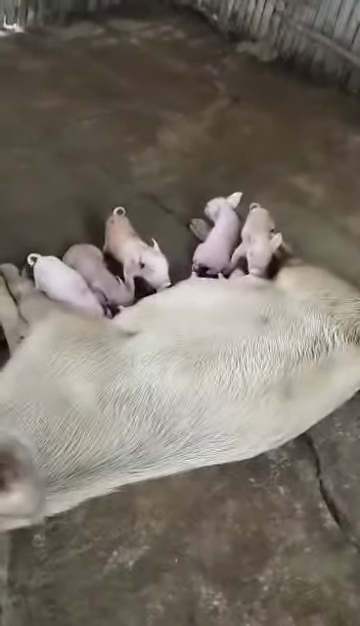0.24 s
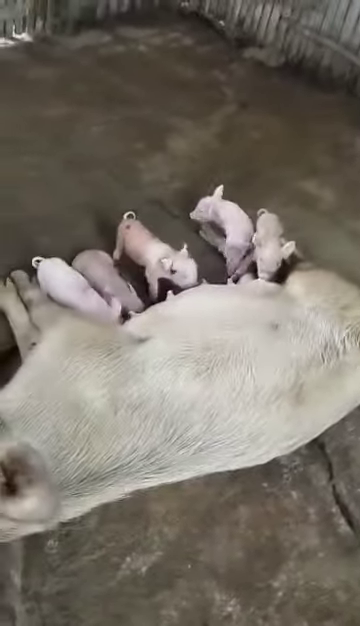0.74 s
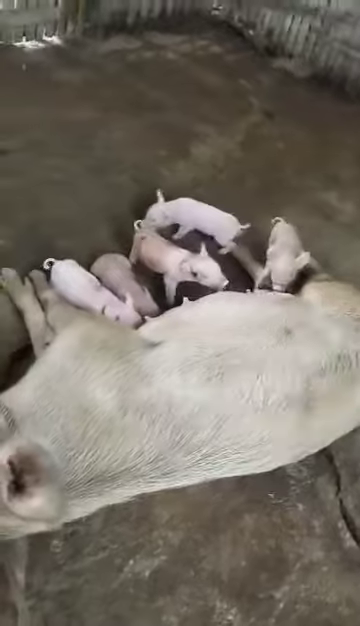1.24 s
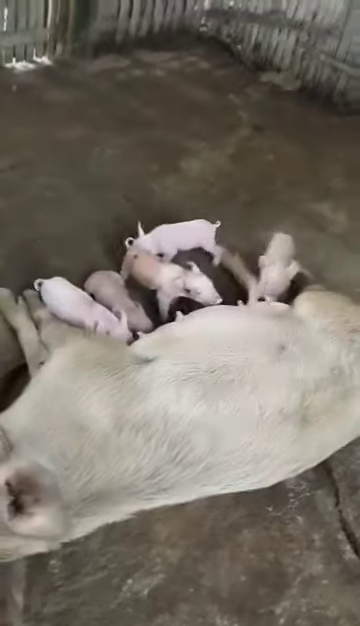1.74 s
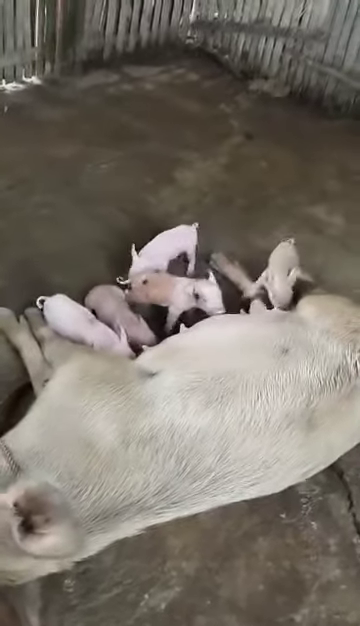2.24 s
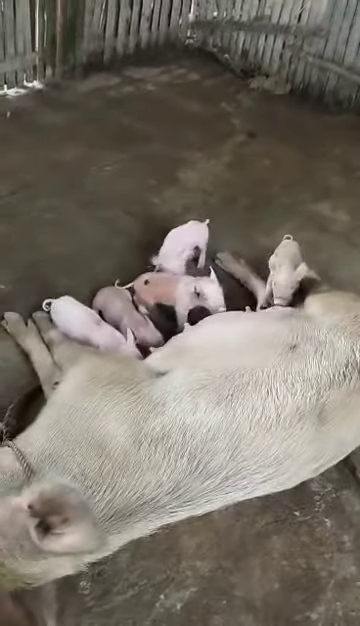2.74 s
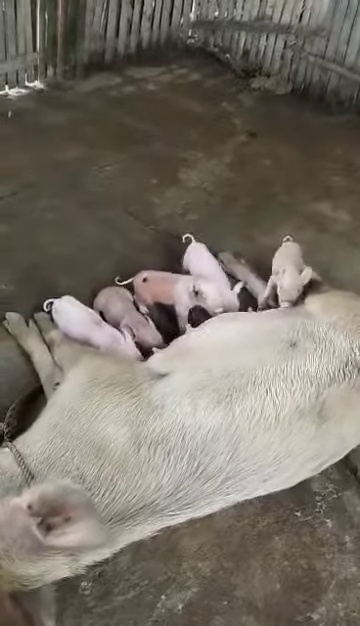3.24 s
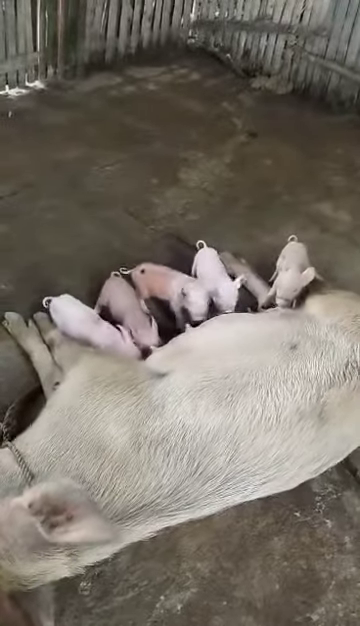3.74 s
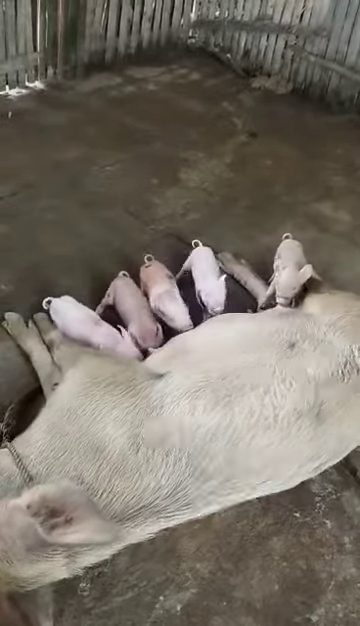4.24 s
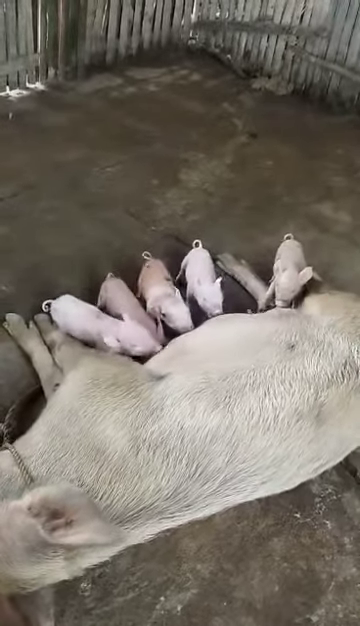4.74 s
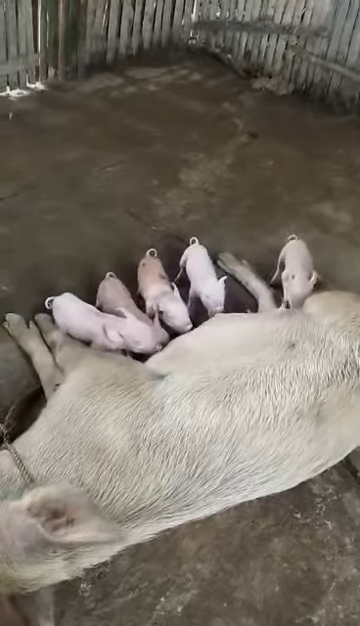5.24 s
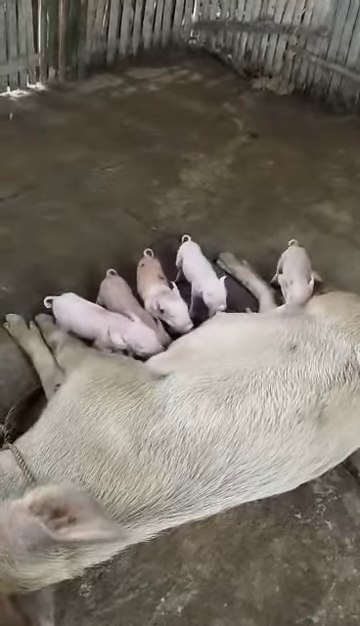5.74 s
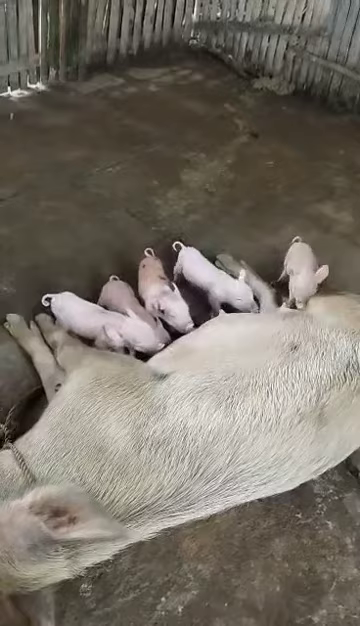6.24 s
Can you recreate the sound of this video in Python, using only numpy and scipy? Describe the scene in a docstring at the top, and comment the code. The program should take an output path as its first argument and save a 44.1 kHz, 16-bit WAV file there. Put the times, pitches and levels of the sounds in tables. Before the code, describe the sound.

A few small hoof ticks and a brief rustle on concrete give way to the low, rattling grunts of a nursing sow, heard from nearby in a pen. After a pause the grunts become a regular rhythm, strongest around the middle, and she sometimes snores as she breathes in. Her piglets snuffle very quietly. Underneath lie a faint, steady, high insect hiss and a slight wind rumble on the microphone.

```python
"""A nursing sow in a concrete pen

Each grunt is a short hum of the vocal folds that breaks into slow flaps of the soft palate, which echo
along her windpipe; between grunts she snores in. Piglets snuffle, tick their hooves and rustle on the
floor. Light wind rumbles on both microphones, the yard drones and far insects hiss near 4 kHz."""
import sys
import numpy as np
from scipy import signal
from scipy.fft import rfft, irfft, next_fast_len
from scipy.io import wavfile
from scipy.ndimage import uniform_filter1d, map_coordinates

SR = 44100
rng = np.random.default_rng(int(sys.argv[2]) if len(sys.argv) > 2 else 0)


def digitize_waveform(pressure):
    """Quantize a signal to 16-bit integers and store it at the path in sys.argv[1].

    Rows of a 2-D input are taken as channels; values are limited to [-1, 1].
    """
    field = np.atleast_2d(pressure).T
    bounded = np.clip(field, -1, 1)
    quanta = np.round(bounded * 32767).astype(np.int16)
    wavfile.write(sys.argv[1], SR, quanta)


N = 285327
TIME = np.arange(N) / SR
EVENT_TIME = np.arange(SR // 10) / SR


def amp(db):
    """Amplitude ratio of a level in decibels."""
    return 10 ** (np.asarray(db) / 20)


def unit(x):
    """Normalisation to rms 1."""
    return x / np.sqrt(np.mean(x ** 2) + 1e-20)


def along(points, hz):
    """Interpolation of (frequency_hz, value) points on a logarithmic frequency axis."""
    f, values = np.transpose(points)
    return np.interp(np.log(hz + 1), np.log(f + 1), values)


def curves(tables, edge_s=.006):
    """Linear envelopes: a gate open during each table, then a curve for each column after time."""
    gate = sum(np.interp(TIME, [t[0][0] - edge_s, t[0][0], t[-1][0], t[-1][0] + edge_s], [0, 1, 1, 0])
               for t in tables)
    times, *columns = np.concatenate(tables).T
    return [gate] + [np.interp(TIME, times, column) for column in columns]


def wobble(rate_hz):
    """Smooth random modulation: a spline through Gaussian knots."""
    return map_coordinates(rng.standard_normal(int(N * rate_hz / SR) + 4), [TIME * rate_hz])


def filtered(x, response):
    """Linear filtering: the spectrum of x times a frequency response."""
    size = next_fast_len(N + SR // 8, real=True)
    return irfft(rfft(x, size) * response(np.fft.rfftfreq(size, 1 / SR)), size)[..., :N]


def modes(table, f):
    """Superposition of damped resonances, each (centre_hz, width_hz, gain_db)."""
    return sum(amp(db) * 1j * f * width / (hz * hz - f * f + 1j * f * width) for hz, width, db in table)


def band(x, hz):
    """Band-pass filtering, a fifth either side of hz."""
    return signal.lfilter(*signal.butter(2, [hz / 1.5, hz * 1.5], "band", fs=SR), x)


def noise(spectrum, correlation):
    """Partly coherent stereo noise of rms 1, from the sum and difference of two independent noises."""
    angle = np.arccos(correlation) / 2
    mid, side = filtered(rng.standard_normal((2, N)), lambda f: amp(along(spectrum, f)))
    mid, side = np.cos(angle) * mid, np.sin(angle) * side
    return unit(np.array([mid + side, mid - side]))


# Spectrum of the wind: frequency_hz, density_db
WIND_SPECTRUM = [(8.8, -50.5), (15, 4.5), (78, -3.5), (92, -18), (110, -4.5), (140, -57.5), (240, -120)]
# Gusts: peak_s, above_lull_db
WIND_GUSTS = [(.36, 10), (1.49, 10), (2.379, 11.5), (3.301, 12.5), (4.2, 15), (5.4, 13), (6.3, 12)]


def wind(lull_db=-57, gust_s=.41):
    """Turbulence: pressure fluctuates unevenly on each microphone, more strongly on the left."""
    lumps = amp(2.5 * np.array([wobble(6), wobble(9)]))
    gust_db = sum(db * np.exp(-((TIME - peak_s) / gust_s) ** 2) for peak_s, db in WIND_GUSTS)
    rumble = unit(lumps * noise(WIND_SPECTRUM, correlation=.46))
    return amp(lull_db + gust_db) * rumble * amp([[2.2], [-2.2]])


# Spectrum of the yard's drone: frequency_hz, density_db
YARD_SPECTRUM = [(53, -30.5), (90, -27.5), (123, 5), (178, -7), (244, -5), (452, -11.5), (795, -18.5),
                 (1200, -51), (1560, -62), (2640, -120)]
# Its envelope: time_s, level_db
YARD_LEVELS = [(0, -58), (.8, -57.5), (1.3, -61.5), (2.7, -58), (4.55, -58), (6.47, -61)]


def yard():
    """Amplitude-modulated low noise: the dull drone of the yard."""
    _, level_db = curves([YARD_LEVELS])
    return amp(level_db + 1.4 * wobble(12)) * noise(YARD_SPECTRUM, correlation=.66)


# Spectrum of far insects: frequency_hz, density_db
INSECT_SPECTRUM = [(590, -36.5), (1000, -1), (1100, -5.5), (1420, -6), (1880, -8), (2340, -7),
                   (2520, -14.5), (2720, -6.5), (3150, -9.5), (3400, -0.5), (3900, 1), (4450, -1),
                   (4800, -11), (6950, -14.5), (7920, -20.5), (12500, -29.5), (13500, -18.5)]


def insects(level_db=-64):
    """Incoherent summation: far insects merge into a nearly steady, diffuse hiss."""
    return amp(level_db + .36 * wobble(1.7)) * noise(INSECT_SPECTRUM, correlation=0)


# Piglet sniffs: start_s, level_db, centre_hz, length_s
SNIFFS = [(0.02, -59, 405, 0.12), (0.261, -66.5, 1050, 0.06), (0.65, -59, 850, 0.061),
          (2.755, -50.5, 392, 0.075), (3.983, -61, 750, 0.071), (5.241, -63, 632, 0.039),
          (5.554, -58, 413, 0.11)]


def snuffles():
    """Turbulent flow in piglet snouts: band noise under a sine arch, cut off at 0.1 s."""
    out, t = np.zeros(N), EVENT_TIME
    for start_s, db, hz, length_s in SNIFFS:
        swell = np.sin(np.pi * np.clip(t / length_s, 0, 1))
        out[round(start_s * SR):][:len(t)] += amp(db) * swell * unit(band(rng.standard_normal(len(t)), hz))
    return out


# Hooves on concrete: start_s, level_db, pitch_hz, t60_s
HOOF_TICKS = [(0.1327, -28.5, 3080, 0.0053), (0.1332, -35, 4280, 0.016), (0.1422, -30, 3400, 0.0095),
              (0.396, -53, 4400, 0.07), (1.322, -47, 4700, 0.024), (1.917, -49, 4230, 0.019),
              (4.597, -51, 3920, 0.17), (5.2627, -46.5, 4150, 0.042)]


def hooves():
    """Impact excitation: each small hoof gives a tone and gritty noise that decay exponentially."""
    out, t = np.zeros((2, N)), EVENT_TIME
    for start_s, db, hz, t60_s in HOOF_TICKS:
        tick = .37 * np.sin(2 * np.pi * hz * t) + .81 * rng.standard_normal((2, len(t)))
        out[:, round(start_s * SR):][:, :len(t)] += band(amp(db - 60 * t / t60_s) * tick, hz)
    return out


# Envelope of the rustle: time_s, level_db
RUSTLE_LEVELS = [(0.145, -75.5), (0.153, -62.5), (0.205, -50), (0.215, -63)]
# Spectrum of the litter: frequency_hz, density_db
LITTER_SPECTRUM = [(710, -6), (1200, -9.5), (3350, -3.5), (9830, -10), (11100, -26), (12500, -1),
                   (13600, -13)]


def rustle():
    """Friction noise: a piglet drags over the litter and stops short."""
    gate, level_db = curves([RUSTLE_LEVELS], edge_s=.003)
    return gate * amp(level_db + .85 * wobble(200)) * noise(LITTER_SPECTRUM, correlation=.33)


def windpipe(x, echo, round_trip_s=.0088):
    """Comb filtering: sound returns from the windpipe's far end again and again, duller each time."""
    def response(f):
        round_trip = echo * np.exp(-2j * np.pi * f * round_trip_s) / (1 + 1j * f / 2500)
        return 1j * f / (70 + 1j * f) / (1 - round_trip)
    return filtered(x, response)


def hum_shape(start_s, length_s, swell_s, db, first_hz, held_hz, last_hz,
              throat_hz, mouth, rough, snout_hz, snout_db):
    """Tension sets pitch: one hum's envelopes, as the folds settle, glide and roughen."""
    swell_db_per_s, fade_db_per_s, settle_s = 133.5, 150.5, .01193
    progress = np.linspace(0, 1, 24)
    t = progress * length_s
    level_db = db - swell_db_per_s * np.maximum(swell_s - t, 0) - fade_db_per_s * np.maximum(t - swell_s, 0)
    level_db -= 11 * progress ** 6  # dies away just before the palate lets go
    onset = np.exp(-(t / settle_s) ** 3)
    hz = held_hz + (last_hz - held_hz) * progress + (first_hz - held_hz) * onset
    hiss_db = db - 19.5 - 23.5 * np.exp(-t / .022)  # the breath arrives late
    # The mouth is wider at a tight onset, and again towards the first flap.
    opening = mouth + .013 * max(first_hz - held_hz, 0) * onset + .1 * progress ** 2
    roughness = rough * (1 + .7 * progress)
    columns = start_s + t, level_db, hz, throat_hz, hiss_db, opening, roughness, snout_hz, snout_db
    return np.transpose(np.broadcast_arrays(*columns))


# Hums of the vocal folds: start_s, length_s, swell_s, level_db, first_pitch_hz, held_pitch_hz,
# last_pitch_hz, throat_hz, mouth_opening, roughness, snout_hz, snout_db
FOLD_HUMS = [(0.4405, 0.061, 0.01, -34.5, 190, 199, 224.4, 212, 0.33, 0.31, 1140, -12),
             (1.363, 0.046, 0.034, -31.5, 190, 208, 213, 222, 0.56, 0.31, 1000, -41),
             (2.106, 0.069, 0.062, -26, 213, 224.5, 198.5, 232, 0.25, 0.42, 720, -28),
             (2.936, 0.088, 0.062, -22, 217.2, 143, 155.3, 233, 0.4, 0.16, 1500, -32.5),
             (3.323, 0.063, 0.076, -17, 196, 145.5, 136.8, 233, 0.28, 0.15, 1040, -27),
             (3.86, 0.056, 0.014, -29, 190.2, 140.6, 133.4, 204, 0.5, 0.3, 1120, -24.5),
             (4.3196, 0.049, 0.045, -26.5, 198.3, 145.7, 134.8, 241, 1, 0.3, 1132, -18),
             (4.7937, 0.048, 0.02, -26.5, 198, 147.3, 138, 236, 0.6, 0.32, 1180, -20.5),
             (5.349, 0.037, 0.03, -30, 191.7, 182, 174, 207, 0.7, 0.25, 1130, -25),
             (5.891, 0.054, 0.021, -30, 192, 146.6, 114, 202, 0.4, 0.23, 1200, -21),
             (6.4083, 0.058, 0.019, -28, 204.8, 138.6, 138.3, 217, 0.52, 0.27, 1210, -24)]
# Upper formants that open with the mouth: centre_hz, width_hz, gain_db
UPPER_FORMANTS = [(567, 38, -1), (1000, 8.1, -23), (1370, 110, -49.5), (1650, 130, -42)]


def hum():
    """Source and filter: formants weight the folds' harmonics. Gives voice and two breath envelopes."""
    shapes = [hum_shape(*row) for row in FOLD_HUMS]
    gate, db, hz, throat_hz, hiss_db, mouth, rough, snout_hz, snout_db = curves(shapes, edge_s=.003076)
    mouth, on = np.clip(mouth, 0, 1), gate > 0
    turns = np.cumsum(hz * (1 + .232 * rough * wobble(120))) / SR  # pitch jitter
    phase = (turns - np.maximum.accumulate(turns * ~on)) % 1  # restarts with each hum
    harmonic = np.arange(1, 17)[:, None]
    f = harmonic * hz[on]
    throat = abs(modes([(throat_hz[on], 90, 0)], f)) ** 2.2
    upper = amp(-10) * mouth[on] * abs(modes(UPPER_FORMANTS, f))
    closure = amp(-28.5) / harmonic  # sharp closing of the folds feeds every overtone
    snout = abs(modes([(snout_hz[on], 280, snout_db[on])], f)) ** 1.4
    knots = rng.standard_normal((len(harmonic), round(70 * N / SR) + 4))
    shimmer = map_coordinates(knots, np.broadcast_arrays(harmonic - 1, 70 * TIME[on]), order=1)
    weights = (throat + upper + closure + snout) * amp(14 * rough[on] * shimmer)
    weights *= amp(6 * rough[on] * shimmer[-1]) / np.sqrt(np.sum(weights ** 2, 0) / 2)
    voice = np.zeros(N)
    # Harmonics in step make one suction a cycle.
    voice[on] = -np.sum(weights * np.cos(harmonic * (2 * np.pi * phase[on] - .41)), 0)
    hiss = amp(hiss_db) * gate * (.9 + np.exp(-3 * phase))
    return windpipe(amp(db) * gate * voice, echo=.15), (1 - mouth) * hiss, mouth * hiss


def wet_air(patchy_db):
    """Turbulence in a wet airway: half-coherent stereo noise, patchy in frequency and time."""
    shared = rng.standard_normal(N)
    air = np.array([np.roll(shared, 16), shared]) + rng.standard_normal((2, N))
    spectra = signal.stft(air, nperseg=256)[2]
    patches = uniform_filter1d(rng.standard_normal(spectra.shape[1:]), size=3, axis=0)
    patches = unit(uniform_filter1d(patches, size=4, axis=1))
    return unit(signal.istft(spectra * amp(patchy_db * patches), nperseg=256)[1][:, :N])


# Air noise before the airway: frequency_hz, density_db
BREATH_SPECTRUM = [(300, -53), (700, 23.5), (1200, 16), (3000, 15), (7000, 6), (10200, -22), (11000, -77),
                   (14000, -67)]
# Airway resonances with the mouth shut, then open: centre_hz, width_hz, gain_db
NOSE_MODES = [(138, 29, -5.5), (225, 16.5, 6), (335.8, 29, 2), (516, 30, -7.5), (789, 106, -6.5),
              (1006, 79, 0), (1258, 102, 3.5), (1615, 81, -3.5), (2043, 51, -8), (3032, 100, -8),
              (4240, 100, -34), (6180, 300, -21.5), (9500, 500, -9.5)]
MOUTH_MODES = [(137.6, 14, -8), (292.7, 45.4, -3.5), (587.8, 37, -3), (704, 26, -21), (1156, 77, -17),
               (1268, 62, -8.5), (1535, 42, 1.5), (2630, 530, -6.5), (3220, 62, -2.5), (3970, 480, -7.5),
               (5950, 990, -12.5), (9340, 270, 5.5)]


def breath(nose_envelope, mouth_envelope):
    """Aspiration: lumpy air noise excites the resonances of nose and mouth in parallel."""
    air = amp(1.5 * wobble(150)) * wet_air(patchy_db=3.5)
    out = np.zeros((2, N))
    for envelope, airway in (nose_envelope, NOSE_MODES), (mouth_envelope, MOUTH_MODES):
        response = lambda f: amp(along(BREATH_SPECTRUM, f)) * modes(airway, f)
        rms_gain = np.sqrt(np.mean(abs(response(np.linspace(0, SR / 2, 4000))) ** 2))
        out += filtered(envelope * air, response) / rms_gain
    return out


def flap_train(start_s, gap_s, slowing_s, count, first_db, last_db, mouth,
               jaw_hz, snout_hz, puff_db, bite_hz, bite_db):
    """Relaxation oscillation of the palate: one row a flap, with less air left for each."""
    jaw_db, snout_db = -19.5 + 25 * mouth, -2.5 - 21.5 * mouth  # opening favours the jaw cavity
    progress = np.linspace(0, 1, round(count))
    arch_db = 7.5 * 4 * progress * (1 - progress)  # lifts the middle flaps
    levels = first_db + (last_db - first_db) * progress + arch_db
    return [(start_s + k * gap_s + k * (k - 1) / 2 * slowing_s, db, puff_db - .5 * k, mouth,
             jaw_hz, jaw_db, snout_hz, snout_db, bite_hz, bite_db - 3 * k) for k, db in enumerate(levels)]


def bite(hz, age, ring_t60_s=.02, air_t60_s=.035, overtone=1.4):
    """Damped resonance at the back of the mouth: a bright ring, plus noise from the freed air."""
    drift = np.cumsum(rng.normal(0, .07, len(age)) * (age > 0))  # a wet cavity rings unsteadily
    phase = 2 * np.pi * hz * age
    ring = np.sin(phase + drift) + amp(-7) * np.sin(overtone * phase - drift)
    ring *= amp(rng.normal(0, 1.4) - 60 * age / ring_t60_s)
    air = amp(11.5 - 60 * age / air_t60_s) * (age > 0) * rng.standard_normal(len(age))
    f = np.fft.rfftfreq(len(age), 1 / SR)
    cavity = modes([(hz, 160, 0), (overtone * hz, 240, -2), (overtone ** 2 * hz, 500, -8)], f)
    return ring + irfft(rfft(air) * cavity / (1 + 1j * f / 8000) ** 4, len(age))


# Flutters of the soft palate: start_s, gap_s, gap_growth_s, flap_count, first_db, last_db,
# mouth_opening, jaw_hz, snout_hz, puff_relative_db, bite_hz, bite_relative_db
PALATE_FLUTTERS = [ (0.4935, .0362, 0, 2, -26, -30.5, 0.33, 750, 1730, -12, 3070, -12),
                   (1.414, .030, 0, 1, -26, -28, 0.24, 525, 1160, -17, 3220, -32),
                   (1.444, .037, .002, 3, -20.5, -42.5, 0.38, 586, 1280, -10.5, 3200, -16.5),
                   (1.588, .041, 0, 2, -26.5, -31, 0.18, 530, 986, -12, 3160, -51),
                   (2.165, .040, 0, 1, -20, -24, 0.46, 563, 1260, -11, 2970, -30),
                   (2.204, .035, 0, 2, -18, -25, 0.44, 638, 1370, -13, 3060, -12),
                   (2.313, .0325, .002, 4, -21, -32.5, 0.18, 455, 2064, -9, 3100, -44),
                   (2.501, .032, .002, 4, -29.5, -29, 0.18, 807, 1264, -8, 2970, -20.5),
                   (3.031, .035, 0, 2, -18.5, -34.5, 0.72, 697, 1580, -15.5, 3340, -35),
                   (3.3922, .026, 0, 2, -17, -18, 0.47, 686, 1600, -13.5, 2790, -14),
                   (3.927, .037, 0, 2, -20, -27.5, 0.38, 590, 1673, -13, 3200, -15),
                   (4.379, .034, .002, 3, -15.5, -36, 0.48, 737, 1600, -19.5, 3030, -28),
                   (4.8331, .021, 0, 1, -21.5, -23, 0.3, 570, 1130, -46, 2730, -17.5),
                   (4.855, .034, .002, 3, -18, -39, 0.45, 662, 1680, -13, 2890, -24.5),
                   (5.384, .023, 0, 1, -28, -24, 0.12, 584, 1150, -8.5, 2720, -18.5),
                   (5.408, .034, .002, 3, -19, -34, 0.37, 620, 1605, -13, 2950, -27),
                   (5.954, .034, 0, 2, -20.5, -25, 0.24, 520, 1190, -11.5, 2870, -14),
                   (6.05, .0305, .003, 5, -30, -31.5, 0.17, 794, 2087, -8.5, 3240, -34)]
# Soft closings of the throat: time_s, level_db
THROAT_GULPS = [(1.558, -33), (2.297, -34.5), (2.475, -34.5), (2.886, -36), (3.259, -33.5), (3.807, -41),
                (4.244, -38), (4.712, -38), (5.293, -45), (5.839, -42.5), (6.346, -36)]


def flaps(flap_closing_s=.0005, gulp_closing_s=.00096, lead_s=.004, seal_s=.053):
    """Impulse excitation: each closure's suction rings the airway. Gives pops and two puff envelopes."""
    closures = [(flap_closing_s, flap) for row in PALATE_FLUTTERS for flap in flap_train(*row)]
    closures += [(gulp_closing_s, (time_s, db, -22, .068, 580, -10, 1200, -30, 3000, -60))
                 for time_s, db in THROAT_GULPS]
    suctions, puffs = np.zeros((2, 2, N + SR))
    cavities, bites = np.zeros((2, N + SR))
    t = EVENT_TIME
    age = np.maximum(t - .0045, 0)  # the rings start just after the suction peaks
    # A sharp spit, then a longer hiss that ends as the palate seals again.
    puff = (1.1 * amp(-60 * t / .01) + amp(-60 * t / .21) / (1 + (t / seal_s) ** 6)) * (t > lead_s)
    for closing_s, row in closures:
        time_s, db, puff_db, mouth, jaw_hz, jaw_db, snout_hz, snout_db, bite_hz, bite_db = row
        start = round((time_s - lead_s) * SR)
        span, shares = slice(start, start + len(t)), [1 - mouth, mouth]
        width_s = closing_s * amp(-.3 * (db + 16))  # a harder flap closes faster
        suctions[:, span] -= np.outer(shares, amp(db) / (1 + ((t - lead_s) / width_s) ** 2) ** 2.62)
        for hz, ring_db, t60_s in (jaw_hz, jaw_db, .052), (snout_hz, snout_db, .06):
            turns = hz * rng.normal(1, .017) * age  # soft walls: each ring is a little off pitch
            cavities[span] += amp(db + ring_db - 60 * age / t60_s) * np.sin(2 * np.pi * turns)
        bites[span] += amp(db + bite_db) * bite(bite_hz, age)
        puffs[:, span] += np.outer(shares, amp(db + puff_db + rng.normal(0, 1.5)) * puff)
    nasal, oral = suctions[:, :N]
    pops = windpipe(nasal + oral, echo=.45)
    pops += amp(15.5) * filtered(nasal, lambda f: modes(NOSE_MODES, f))
    pops += amp(24) * filtered(oral, lambda f: modes(MOUTH_MODES, f))
    pops += windpipe(cavities[:N], echo=.1) + windpipe(bites[:N], echo=.35)
    return pops, *puffs[:, :N]


def snore_shape(peak_s, rise_s, fall_s, thump_db, flap_hz, flap_s, rasp_s, rasp_db, rise_db_per_s):
    """Flutter slows as the breath runs out: rows of time_s, thump_db, rasp_db, flap_turns."""
    thump_drop_db_per_s2, fall_db_per_s, slowing_hz_per_s = 2603.5, 151, 90
    t = np.linspace(-rise_s, fall_s, 40)
    since_rasp, since_flap = peak_s + t - rasp_s, peak_s + t - flap_s
    thump = thump_db - thump_drop_db_per_s2 * t * t
    rasp = rasp_db + np.where(since_rasp < 0, rise_db_per_s, -fall_db_per_s) * since_rasp
    turns = flap_hz * since_flap - slowing_hz_per_s / 2 * since_flap ** 2
    return np.transpose([peak_s + t, thump, rasp, turns])


# In-drawn snores: peak_s, rise_s, fall_s, thump_db, flap_rate_hz, flap_time_s, rasp_peak_s, rasp_db,
# rasp_rise_db_per_s, nasal_ring_hz, nasal_ring_db
INWARD_SNORES = [(1.829, 0.09, 0.059, -38.5, 42, 1.8265, 1.815, -48.5, 398, 1470, 24),
                 (2.09, 0.039, 0.023, -40, 45, 2.3, 2.07, -48, 217, 2340, 24),
                 (2.795, 0.06, 0.059, -55.5, 39, 3.2, 2.77, -77, 600, 1990, 18),
                 (3.186, 0.19, 0.1, -34, 46.7, 3.1815, 3.165, -44.5, 225, 2210, -6),
                 (4.11, 0.077, 0.048, -36.5, 47, 4.099, 4.082, -45.5, 909, 2000, 9),
                 (5.549, 0.032, 0.037, -48.5, 42, 5.55, 5.526, -59, 602, 2080, -12)]
# Resonances of the snout (thump) and nostrils (rasp): centre_hz, width_hz, gain_db
SNOUT_MODES = [(117, 101, 26.5), (191, 57, -10), (328, 30, -2), (695, 43, 21.5)]
NOSTRIL_MODES = [(846, 190, 26), (1494, 260, 27), (1830, 110, 22), (2080, 200, 22.5), (3500, 250, 9),
                 (4050, 160, 4), (5000, 650, -51), (7000, 1200, -11)]


def snores():
    """Flow-induced flutter: drawn-in air flaps the palate and rasps in the nostrils once a flap."""
    shapes = [snore_shape(*row[:-2]) for row in INWARD_SNORES]
    gate, thump_db, rasp_db, turns = curves(shapes, edge_s=.036)
    knocks = np.clip(np.diff(np.floor(turns), prepend=0), 0, 1)  # one impulse a flap
    push = -knocks * amp(.5 * wobble(68)) + .008 * rng.standard_normal(N)
    thumps = filtered(push, lambda f: modes(SNOUT_MODES, f) / (1 + 1j * f / 480) ** 3)
    thumps = windpipe(thumps, echo=.28)
    out = np.tile(gate * amp(thump_db) * thumps / np.std(thumps[gate > 0]), (2, 1))
    pulsed_air = (1 + 1.2 * np.exp(-3.5 * (turns % 1))) * wet_air(patchy_db=3.2)
    drive = gate * amp(rasp_db) * (pulsed_air - 1.5 * knocks)  # flaps also knock the nasal passages
    f = np.fft.rfftfreq(SR // 2, 1 / SR)
    dark_band = 1 - .8 * modes([(2750, 450, 0)], f)
    for shape, (*_, ring_hz, ring_db) in zip(shapes, INWARD_SNORES):
        nostrils = modes(NOSTRIL_MODES + [(ring_hz, 130, ring_db)], f) * dark_band / (1 + (f / 6500) ** 6)
        nostrils /= np.sqrt(np.mean(abs(nostrils) ** 2))
        start, end = round((shape[0, 0] - .05) * SR), round((shape[-1, 0] + .05) * SR)
        rasp = irfft(rfft(drive[:, start:end], SR // 2) * nostrils)
        out[:, start:end] += rasp[:, :end - start]
    return out


# Reverberation time of the pen: frequency_hz, t60_s
PEN_DECAY = [(200, 0.34), (650, 0.084), (1500, 0.095), (8000, 0.1)]
# Reflected over direct sound: frequency_hz, gain_db
WALL_GAIN = [(150, -50.5), (600, 0), (1200, -2), (8000, -9)]


def pen(x):
    """Reverberation: direct sound, a little earlier on the right, then the concrete walls' short tail."""
    hz, t, spectra = signal.stft(rng.standard_normal((2, SR // 4)), SR, nperseg=256)
    tail = signal.istft(spectra * amp(-60 * t / along(PEN_DECAY, hz)[:, None]), SR, nperseg=256)[1]
    walls = signal.fftconvolve(np.pad(x, (60, 0))[None], tail / np.linalg.norm(tail[0]), axes=1)[:, :N]
    direct = np.array([np.roll(x, 12), x])
    return direct + filtered(walls, lambda f: amp(along(WALL_GAIN, f)))


# The sow's level difference between the microphones: frequency_hz, right_over_left_db
SOW_BALANCE = [(60, -1), (200, 1), (700, -1.5), (1500, 3), (6000, 3.5), (12000, 5)]


def scene():
    """Superposition: the close sow, piglets to the right and the open air."""
    voice, hum_nose, hum_mouth = hum()
    pops, puff_nose, puff_mouth = flaps()
    grunts = pen(voice + pops) + breath(hum_nose + puff_nose, hum_mouth + puff_mouth)
    # Antiresonance: a side pocket of the snout swallows one band.
    grunts = filtered(grunts, lambda f: 1 - .58 * modes([(2300, 280, 0)], f))
    sides = np.array([[-.5], [.5]])
    sow = filtered(grunts + snores(), lambda f: amp(sides * along(SOW_BALANCE, f)))
    piglets = amp([[-3.5], [3.5]]) * (hooves() + snuffles() + rustle())
    return sow + piglets + wind() + yard() + insects()


def record(dry):
    """Soft saturation and band limiting: a phone rounds the tallest peaks and cuts the top treble."""
    ceiling, top_hz = .3, 13400
    rounded = dry / (1 + abs(dry / ceiling) ** 3) ** (1 / 3)
    return filtered(rounded, lambda f: f < top_hz)


dry = scene()
out = record(dry)
digitize_waveform(out)
```